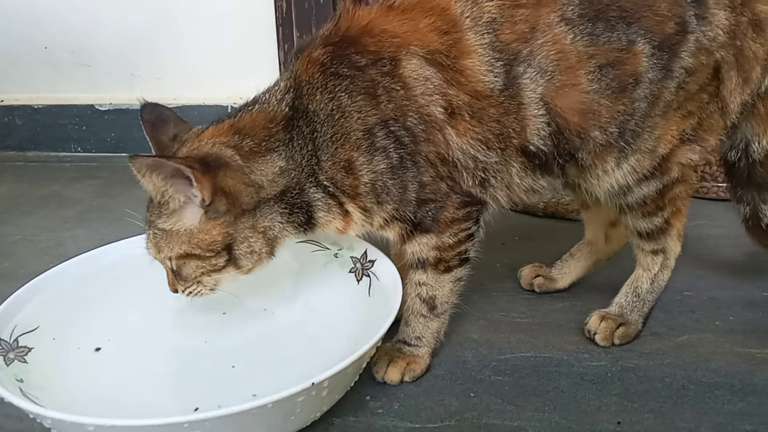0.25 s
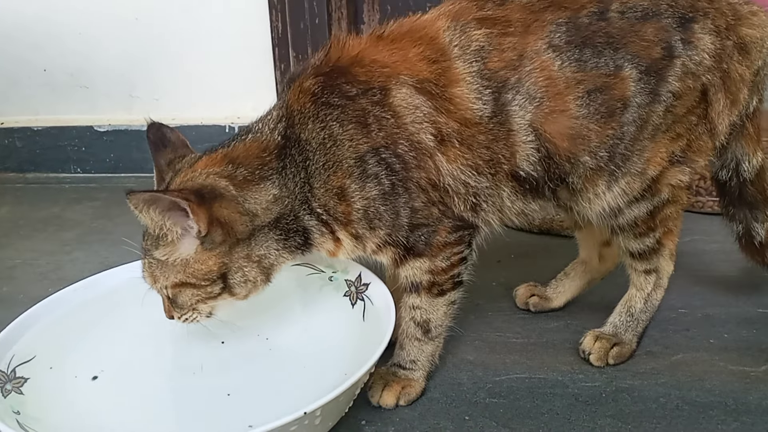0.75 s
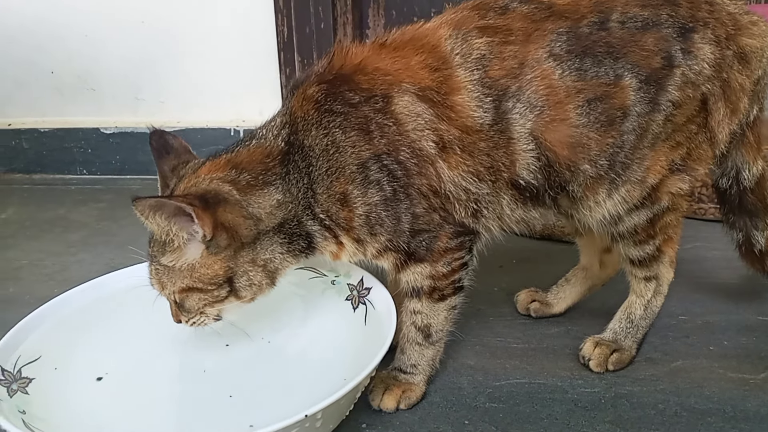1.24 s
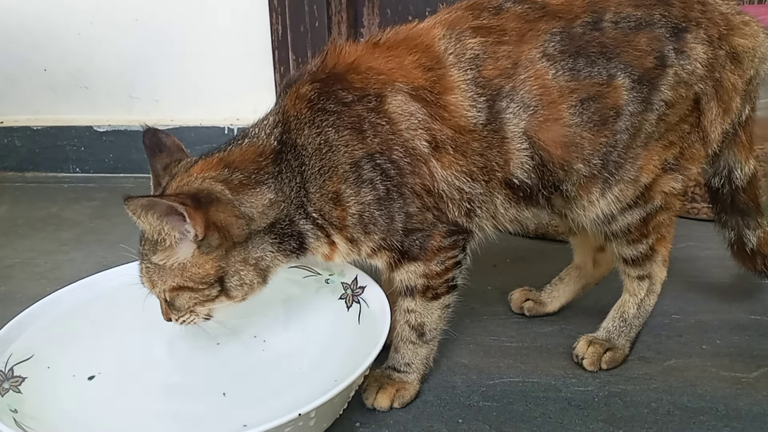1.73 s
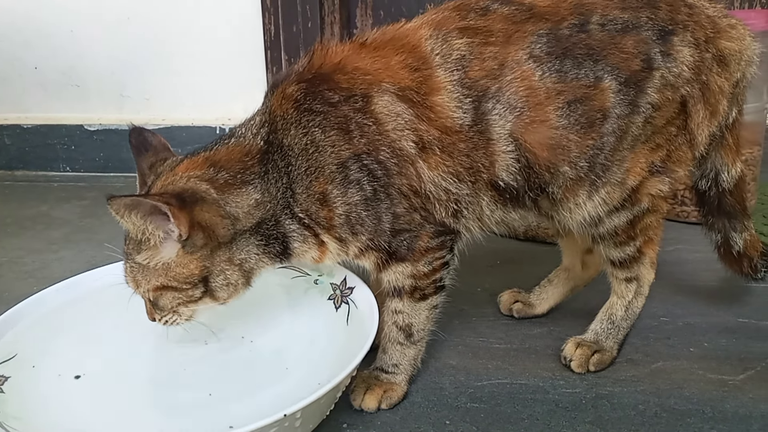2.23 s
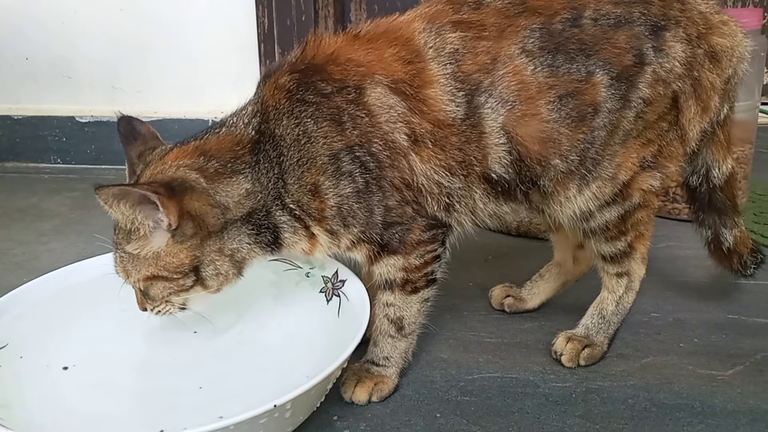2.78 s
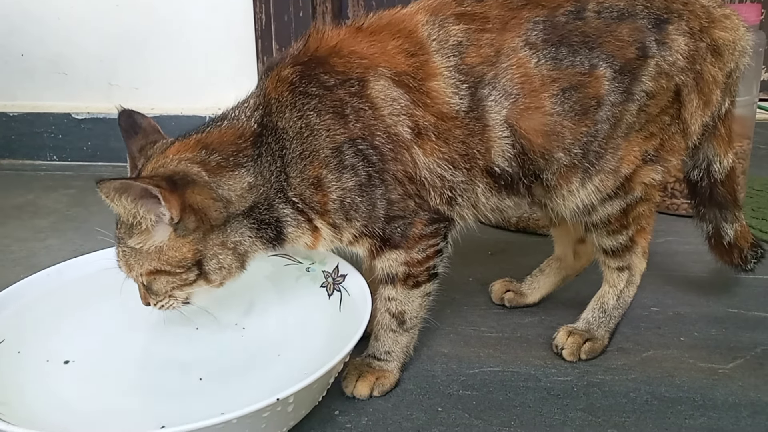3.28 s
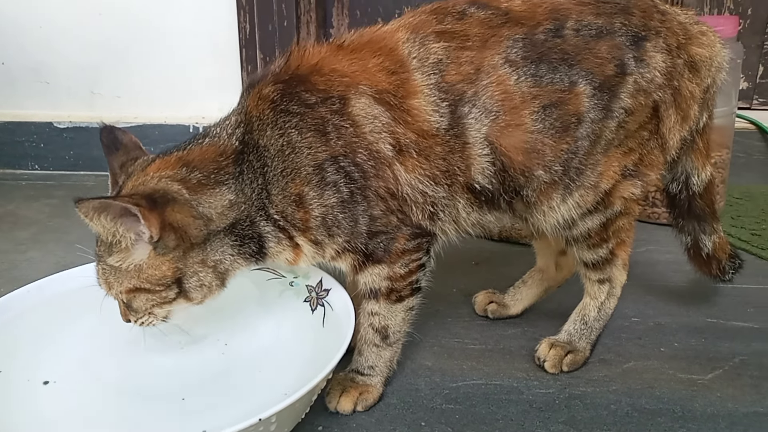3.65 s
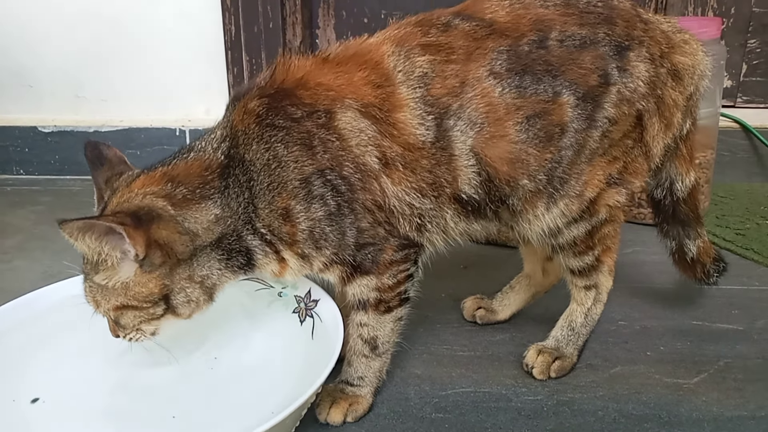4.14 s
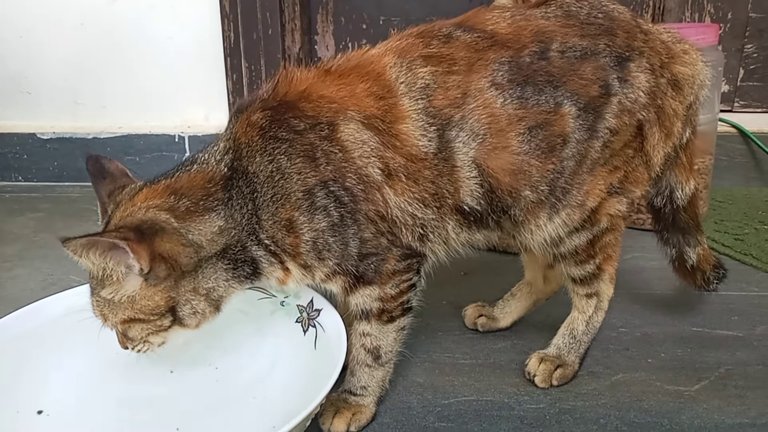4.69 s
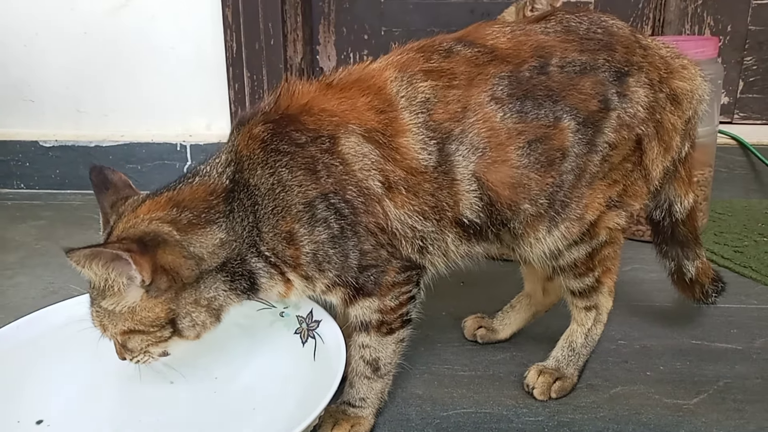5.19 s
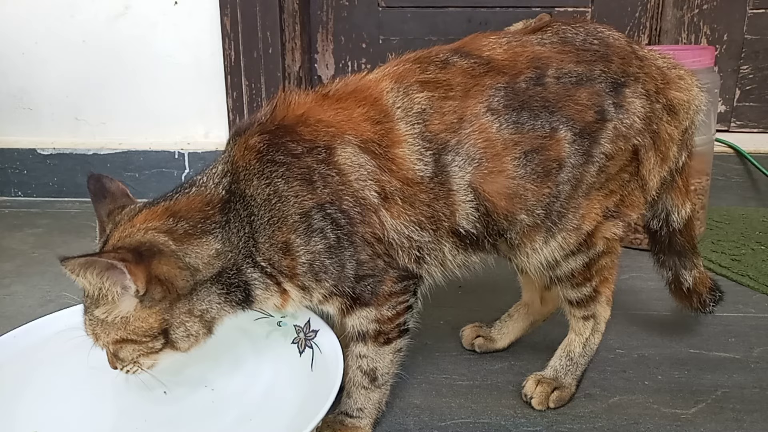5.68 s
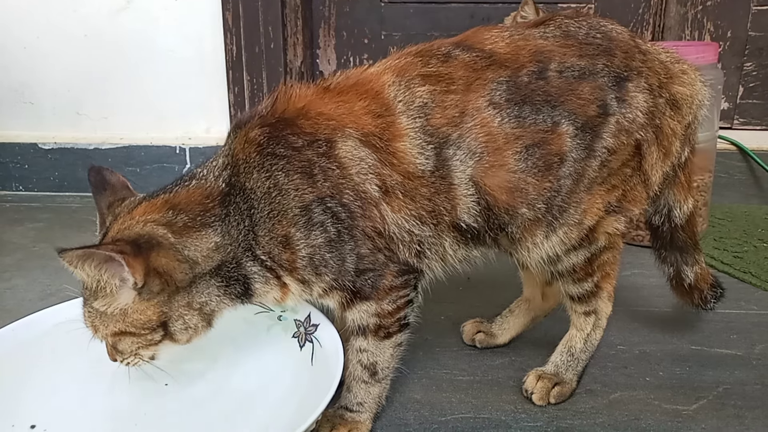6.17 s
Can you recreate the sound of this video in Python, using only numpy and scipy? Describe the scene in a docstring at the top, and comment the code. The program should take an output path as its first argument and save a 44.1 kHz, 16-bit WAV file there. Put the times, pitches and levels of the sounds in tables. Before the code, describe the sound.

A shrill, very high chorus of insects trills throughout on an outdoor porch, mostly to the left, easing slightly after 3.5 seconds. A fainter insect chirps about five times a second beneath it. A cat meows right at the start for half a second, rising a little in pitch, and again, slightly hoarse, from 2.7 to 3.3 seconds. Close by, another cat laps from a basin with small, irregular wet clicks and tiny droplet ticks, clearest between 1 and 2.2 seconds, then quieter, with one clearer smack near 5 seconds. A few soft knocks come from the basin. Far away, faint barks sound between 0.5 and 2 seconds and near 3.3. A distant insect rasps briefly around 2.2 and 5.6 seconds, and a bird gives faint, thin whistles near 3.8, 4.8 and 6 seconds. A faint low motor hum and rumble lie underneath.

```python
"""Porch, insects and two cats

Garden insects, mostly left: a shrill chorus of clicking drums, a very high wing buzz, a steady chirper.
An unseen cat meows twice (vocal-fold harmonics through moving formants); a near cat laps from a basin
(tongue clicks, droplets, soft knocks). Far off: rasps, a thin whistle, a drone of frogs and insects,
soft barks, a thin bird, and a motor hum in low rumble and hiss."""
import sys
import numpy as np
from scipy import signal
from scipy.fft import rfft, irfft
from scipy.io import wavfile

SR = 44100
rng = np.random.default_rng(int(sys.argv[2]) if len(sys.argv) > 2 else 0)


def store_wav(level_fs):
    """Save 16-bit WAV to argv[1]."""
    pcm = np.round(np.clip(np.atleast_2d(level_fs), -1, 1) * 32767)
    wavfile.write(sys.argv[1], SR, pcm.T.astype(np.int16))


N = 283122
T = np.arange(N) / SR
FREQS = np.maximum(np.arange(N // 2 + 1) * SR / N, 1)


def undb(db):
    """Decibels to gain."""
    return 10 ** (np.asarray(db) / 20)


def unit(x):
    """Scale to rms 1."""
    return x / np.sqrt(np.mean(x ** 2) + 1e-18)


def noise():
    """Full-length white noise."""
    return rng.standard_normal(N)


def curves(table):
    """Columns interpolated linearly over the first, t/s."""
    s, *columns = np.transpose(table)
    return [np.interp(T, s, c) for c in columns]


def phase_rad(hz):
    """Running phase of a varying frequency."""
    return 2 * np.pi * np.cumsum(hz) / SR


def colour(x, spectrum):
    """Filter by (f/Hz, level/dB) points; -60 dB/octave beyond the ends."""
    hz, db = np.transpose(spectrum)
    beyond_oct = np.abs(np.log2(FREQS / np.clip(FREQS, hz[0], hz[-1])))
    return irfft(rfft(x) * undb(np.interp(np.log(FREQS), np.log(hz), db) - 60 * beyond_oct), N)


def resonance(hz, centre_hz, width_hz):
    """Steep resonance, gain 1 at centre."""
    return 1 / (1 + ((hz ** 2 - centre_hz ** 2) / (hz * width_hz)) ** 2)


def band(centre_hz, width_hz):
    """Noise in one resonance, rms 1."""
    return unit(irfft(rfft(noise()) * resonance(FREQS, centre_hz, width_hz), N))


def walk(rate_hz):
    """Smooth random drift, rms 1."""
    return unit(irfft(rfft(noise()) * np.exp(-(FREQS / rate_hz) ** 2), N))


def burst(t, rise_s, decay_s):
    """Gaussian rise to 1 at t = 0, exponential decay."""
    return np.exp(-(np.minimum(t, 0) / rise_s) ** 2 - np.maximum(t, 0) / decay_s)


def add(out, start_s, sound):
    """Mix a short sound into out."""
    i = int(start_s * SR)
    a, b = max(i, 0), min(i + len(sound), N)
    out[a:b] += sound[a - i:b - i]


def taps(table, width_ratio, rise_s, decay_s, gain_db=0):
    """Damped bursts of resonant noise; rows: t/s, level/dB, f/Hz."""
    out, t = np.zeros(N), np.arange(-SR // 20, SR // 5) / SR
    hz = np.maximum(np.arange(len(t) // 2 + 1) * SR / len(t), 1)
    for s, db, centre_hz in table:
        grit = rfft(rng.standard_normal(len(t)))
        ring = unit(irfft(grit * resonance(hz, centre_hz, width_ratio * centre_hz), len(t)))
        add(out, s + t[0], undb(db + gain_db) * ring * burst(t - .001, rise_s, decay_s))
    return out


def porch(x, pan_db, wet_db, t60_s, lag_s=0.001419):
    """Direct sound, later on the left, plus scattered reflections; pan_db > 0 is left."""
    t = np.arange(SR // 2) / SR
    echo = rng.standard_normal((2, len(t))) * undb(-60 * t / t60_s) * (t > .003)
    response = echo * undb(wet_db) / np.linalg.norm(echo, axis=1, keepdims=True)
    response[0, int(lag_s * SR)] += 1
    response[1, 0] += 1
    response *= undb([[pan_db / 2], [-pan_db / 2]])
    return signal.fftconvolve(x[None], response / np.linalg.norm(response.mean(0)))[:, :N]


def diffuse(spectrum, envelope, pan_db, shared=0.18, lag_s=.0014):
    """Wide stereo noise, mid rms 1; its shared part reaches the left later."""
    common = shared * noise()
    sides = np.array([noise() + np.roll(common, int(lag_s * SR)), noise() + common])
    sides = colour(sides * envelope, spectrum) * undb([[pan_db / 2], [-pan_db / 2]])
    return sides / sides.mean(0).std()


def wing_strokes(stroke_hz=22.63, scrape_hz=91, depth=0.4, rest=0.3):
    """Wing-stroke envelope: four short scrapes, then a rest."""
    age_s = (np.cumsum(stroke_hz * (1 + 0.0053 * walk(1.9))) / SR % 1) / stroke_hz
    mid_stroke = np.sin(np.pi * stroke_hz * age_s) ** 2
    scrapes = 1 + depth * np.cos(2 * np.pi * scrape_hz * age_s) * mid_stroke
    return scrapes * (1 - rest * (1 - mid_stroke))


def chorus(db, strokes, click_hz=103, decay_s=0.0018, crowd=0.97):
    """Two insects click resonant drums at unequal rates over a crowd's hiss; wing strokes add throb."""
    # drum resonances: f/Hz, level/dB
    spectrum = [(5500, -59), (6100, -28), (6550, -15), (6740, -19), (7080, -5.5), (7260, -2), (7400, 2),
                (7540, -1.5), (7700, -3.5), (8000, -20), (8500, -32), (8900, -52), (9300, -86)]
    power = crowd ** 2
    for k in range(2):
        cycles = np.cumsum(click_hz * (1 - 0.082 * k) * (1 + .035 * walk(3.6))) / SR
        age_s = (cycles % 1) / click_hz
        power = power + undb(-5 * k) * np.exp(-2 * age_s / decay_s)
    envelope = np.sqrt(power) * undb(0.71 * walk(47))
    throb = 1 + 0.52 * (strokes - strokes.mean())
    return diffuse(spectrum, envelope, pan_db=19.5, shared=0.83) * undb(db) * throb


def high_buzz(db, strokes):
    """Scraping wings ring near 15 kHz."""
    # wing resonances: f/Hz, level/dB
    spectrum = [(12500, -63), (13500, -37), (13950, -29), (14300, -5.5), (14650, 4), (15150, 4), (15650, 0),
                (16000, -12)]
    return diffuse(spectrum, strokes, pan_db=10.5, shared=0.6) * undb(db)


def near_insect(hz, db, pulse_hz, depth, pan_db, waver_hz=14):
    """One insect stands out as a wavering, pulsing tone."""
    carrier = np.sin(phase_rad(hz + waver_hz * walk(10.02)))
    pulses = 1 + depth * np.cos(phase_rad(pulse_hz * (1 + 0.01116 * walk(3.3))))
    return porch(unit(carrier * pulses) * undb(db), pan_db, wet_db=-16, t60_s=0.13)


def chirper(first_s=-0.017, peak_db=-51.5, tooth_hz=190, trill_db=-68):
    """About five scrapes a second, each brightening late, over a faint steady trill."""
    # wing resonance: f/Hz, level/dB
    spectrum = [(4200, -54), (4480, 6), (4700, 14.5), (5000, 4.5), (5600, -5.5), (6100, -28)]
    # chirp tempo: t/s, rate/Hz
    tempo = [(0, 4.855), (2.4, 4.727), (3.0, 5.043), (5.0, 4.722), (5.7, 5.094), (6.4, 4.888)]
    rate_hz, = curves(tempo)
    cycles = np.cumsum(rate_hz) / SR - first_s * rate_hz[0]
    nearest = np.round(cycles).astype(int)
    age_s = (cycles - nearest) / rate_hz
    peak = undb(peak_db + rng.standard_normal(nearest[-1] + 1))[nearest]
    teeth = 1 + .5 * np.sin(phase_rad(tooth_hz * (1 + 0.047 * walk(16.74))))
    envelope = peak * burst(age_s, 0.018, 0.028) + undb(trill_db)
    body = diffuse(spectrum, teeth, pan_db=12.5, shared=0.98) * envelope
    upper = band(5300, 600) * teeth * peak * undb(-5) * burst(age_s - 0.0084, 0.016, 0.019)
    return body + porch(upper, pan_db=6, wet_db=1, t60_s=0.18)


def thin_insect(db=-72, first_dip_s=0.19, period_s=0.675, dip_s=0.095, depth=0.78):
    """Thin whistle on the right with short, even dips."""
    # whistle band: f/Hz, level/dB
    spectrum = [(9300, -31), (10300, -8.5), (10850, 12), (11200, -6.5), (12500, -45)]
    from_dip_s = (((T - first_dip_s) / period_s + .5) % 1 - .5) * period_s
    phrases = 1 - depth * np.exp(-(from_dip_s / dip_s) ** 2)
    return diffuse(spectrum, phrases, pan_db=-41) * undb(db)


def far_drone(waver_db=3.96):
    """Distant frogs and insects blur into wavering bands."""
    # call bands: f/Hz, width/Hz, level/dB
    bands = [(1543, 85, -67), (1894.5, 101, -64), (2231, 40, -71.5)]
    drone = sum(band(hz, width_hz) * undb(db + waver_db * walk(9)) for hz, width_hz, db in bands)
    return porch(drone, pan_db=36.5, wet_db=-1, t60_s=0.076)


def rumble(base_db=-56.5, wander_db=4):
    """Low rumble that wanders in level and briefly swells."""
    # rumble spectrum: f/Hz, level/dB
    spectrum = [(22, -26), (42, -16.5), (65, 0), (85, -5.5), (110, 0), (135, -6.5), (170, -2), (230, -13),
                (290, -18.5), (400, -21)]
    # swell crests: t/s, level/dB
    crests = [(0.12, -48), (1.96, -46.5), (2.24, -49), (2.54, -49), (3.15, -44.5), (4.72, -45.5),
              (4.91, -47.5), (5.5, -50.5)]
    swells = sum(undb(db) * burst(T - s, 0.028, 0.018) for s, db in crests)
    envelope = np.hypot(undb(base_db + wander_db * walk(7.5)), swells)
    return diffuse(spectrum, 1, pan_db=4, shared=7.4, lag_s=0.0011) * envelope


def motor_hum(gain_db=-2, waver_db=5.1, waver_hz=2.46):
    """Far motor: four low partials, each wavering in level and pitch."""
    # motor partials: f/Hz, relative level/dB
    partials = [(64.6, -76), (107.7, -67), (188.4, -65.5), (231.5, -67)]
    hum = np.zeros(N)
    for hz, db in partials:
        amplitude = np.sqrt(2) * undb(db + gain_db + waver_db * walk(21))
        hum += amplitude * np.sin(phase_rad(hz + waver_hz * walk(6.13)))
    return porch(hum, pan_db=7, wet_db=-25, t60_s=0.093)


def air(db=-61.5):
    """Faint, wide outdoor hiss."""
    # hiss spectrum: f/Hz, level/dB
    spectrum = [(280, 0.5), (450, -2.5), (900, 1), (1300, 0.5), (1700, 4), (2400, -0.5), (3200, 3.5),
                (3900, -10), (4300, -3.5), (5600, -25)]
    return diffuse(spectrum, undb(1.36 * walk(4.5)), pan_db=6.5, shared=0.31) * undb(db)


def mouth(age_s, held_s, db, open_s, close_s=0.13, linger_s=0.086, fall_db_per_s=138):
    """Hum, open, hold, close: gains of the fundamental and both formants, and closure (0-1)."""
    closing_s = np.maximum(age_s - held_s, 0)
    shut = 1 - np.exp(-closing_s / close_s)
    opening = np.exp(-(np.minimum(age_s - open_s, 0) / open_s) ** 2)
    brightening = 1 - np.exp(-(np.maximum(age_s, 0) / 0.023) ** 2)
    closed_hum = undb(-38.5) * burst(age_s + 0.021, 0.043, 0.024)
    hum = closed_hum + opening * undb(-54 - 1.5 * shut)
    first = opening * undb(db - 7 - fall_db_per_s * np.maximum(closing_s - linger_s, 0))
    second = brightening * undb(db - 21.5 * shut)
    return hum, first, second, shut


def meow(call, glide, open_s=0.0054, release_s=0.054, ring_hz=6250, rasp_db=-9):
    """Vocal-fold harmonics through two mouth formants; the folds waver and rasp when pressed."""
    opens_s, held_s, stops_s, db, first_hz, first_width_hz, second_hz, second_width_hz = call
    pitch_hz, = curves(glide)
    age_s = T - opens_s
    hum_gain, first_gain, second_gain, shut = mouth(age_s, held_s, db, open_s)
    hoarse = 0.11 + 0.472 * burst(age_s - 0.0773, 0.023, 0.057)
    voiced = np.clip((stops_s - T) / release_s + .5, 0, 1)
    on = (voiced > 0) & (age_s > -2 * open_s)
    jitter = hoarse * (0.0196 * walk(60) + 0.0503 * walk(167))
    phase = phase_rad(pitch_hz * (1 + jitter))

    harmonics = np.arange(2, 13)[:, None]
    hz = harmonics * pitch_hz[on]
    since_open_s = np.maximum(age_s[on], 0)
    tight = (pitch_hz[on] / 590) ** .5  # mouth tightens as pitch climbs
    jaw = 1 - 0.59 * np.exp(-since_open_s / 0.076)  # jaw drops, first formant climbs
    tongue = 1 + 0.57 * np.exp(-since_open_s / 0.025)  # second formant drops: "ee" into "ow"
    narrowing = np.maximum(1 - 0.94 * shut[on], .1)
    lowpass = 1 / (1 + (hz / (3600 * tight)) ** 40)
    first = resonance(hz, first_hz * jaw, first_width_hz * narrowing) * lowpass
    second = resonance(hz, second_hz * tight * tongue, second_width_hz) * lowpass
    gains = np.hypot(first_gain[on] * first / np.linalg.norm(first, axis=0),
                     second_gain[on] * second / np.linalg.norm(second, axis=0))
    gains += undb(-33) * np.sqrt(second_gain[on]) * resonance(hz, ring_hz, 1200)  # lingering ring
    gains *= undb(2.9 * np.array([walk(19)[on] for _ in harmonics]))

    voice = np.zeros(N)
    voice[on] = np.sqrt(2) * (gains * np.sin(harmonics * phase[on])).sum(0)
    rasp = unit(colour(noise(), [(1500, -33), (2100, 5), (2900, 5), (3300, 5), (3650, -18)]))
    voice += rasp * (1 + np.cos(phase)) * hoarse * second_gain * undb(rasp_db)
    hum = np.sqrt(2) * hum_gain * np.sin(phase)  # the fundamental bends round to both sides
    return (porch(voice * voiced, pan_db=11, wet_db=-2, t60_s=0.33)
            + porch(hum * voiced, pan_db=5, wet_db=-9, t60_s=0.43, lag_s=0.00098))


def unseen_cat():
    """Two meows, each with its own pitch glide."""
    # meows: open/s, hold/s, stop/s, level/dB, formant 1/Hz, width/Hz, formant 2/Hz, width/Hz
    calls = [(-0.07, 0.19, 0.486, -32.5, 1800, 1040, 2890, 790),
             (2.702, 0.27, 3.25, -34, 1750, 1300, 2700, 1240)]
    # pitch, one list per meow: t/s, f/Hz
    glides = [
        [(0.0, 551.7), (0.08, 594), (0.27, 610.2), (0.28, 625), (0.47, 664)],
        [(2.63, 611), (2.684, 521.5), (2.716, 513.7), (2.782, 535), (2.8, 519.2), (2.94, 565.5), (3.24, 598.6)],
    ]
    return sum(meow(call, glide) for call, glide in zip(calls, glides))


def lapping(start_s=3.933, period_s=0.215, return_s=0.088, db=-52.5, bright_db=-19):
    """Smack rows for four quiet laps: the tongue ticks going in and coming out."""
    times_s = (start_s + period_s * np.arange(4)[:, None] + [0, return_s]).ravel()
    return [(s, db + 2.5 * rng.standard_normal(), bright_db) for s in times_s]


def drinking_cat(mouth_hz=3300, teeth_hz=5850):
    """Laps click in two broad mouth resonances; droplets snap; mouth and paws knock softly."""
    # tongue smacks: t/s, relative level/dB, upper resonance offset/dB
    smacks = [(0.115, -47, 12), (0.4414, -38, -10), (1.0992, -36.5, -4), (1.3243, -41, -20),
              (1.491, -36.5, 0), (1.7125, -30, -1.5), (1.929, -42, -13), (2.0674, -34.5, -25),
              (3.3605, -50, 8), (4.946, -40, 3.5), (5.0684, -50, -3), (5.2926, -42, -27), (6.0534, -50, -2)]
    # droplet snaps: t/s, relative level/dB, f/Hz
    droplets = [(0.1131, -37, 9400), (0.9477, -38, 11400), (1.0999, -39, 10500), (1.1967, -32, 10500),
                (1.4905, -41, 9480), (1.7729, -45, 11200), (2.2079, -34, 11200), (3.2265, -36, 11460),
                (3.36, -38, 10100), (3.6227, -37.5, 10700), (3.677, -42, 11400)]
    # knocks at the basin: t/s, relative level/dB, f/Hz
    knocks = [(0.119, -73, 1230), (1.278, -56.5, 510), (2.266, -66, 720), (3.359, -61, 614),
              (3.448, -56, 496), (3.529, -67, 1390), (3.668, -64, 567), (3.87, -54.5, 1440)]
    ticks = smacks + lapping()
    low = [(s, db, mouth_hz) for s, db, _ in ticks]
    high = [(s, db + bright_db, teeth_hz) for s, db, bright_db in ticks]
    laps = taps(low, width_ratio=.22, rise_s=.0045, decay_s=.0038, gain_db=-2)
    laps += taps(high, width_ratio=.24, rise_s=.002, decay_s=.0025, gain_db=-4)
    spray = taps(droplets, width_ratio=.18, rise_s=.002, decay_s=.0013, gain_db=-13)
    thuds = taps(knocks, width_ratio=.66, rise_s=.002, decay_s=.0068, gain_db=8)
    tongue = colour(laps, [(2500, -10), (2900, 0), (3700, -1.5), (4200, -12.5), (5200, 4), (7500, 9)])
    return (porch(tongue, pan_db=14.5, wet_db=-6, t60_s=0.1)
            + porch(spray, pan_db=-13, wet_db=-2, t60_s=0.08)
            + porch(thuds, pan_db=14, wet_db=-5, t60_s=0.18))


def far_barks():
    """Distance leaves one soft, hollow band of each bark."""
    # barks and yelps: t/s, level/dB, f/Hz
    barks = [(.5, -55, 828), (1.0, -58, 770), (1.46, -58.5, 795), (1.86, -57.5, 770), (3.28, -54.5, 1080),
             (3.39, -54.5, 1280)]
    bursts = taps(barks, width_ratio=.46, rise_s=.031, decay_s=.024)
    return porch(bursts, pan_db=6, wet_db=4, t60_s=0.24)


def rasping_insect(swell_db_per_s=16, attack_s=0.082, fall_s=0.071):
    """A farther insect: two long rasps that swell and stop."""
    # insect resonances: f/Hz, level/dB
    spectrum = [(2700, -17.5), (3150, -3.5), (3450, -4), (3650, 1), (3950, -1), (4130, -8), (4350, -52)]
    # rasps: t/s, length/s, end level/dB
    calls = [(2.08, 0.32, -47.5), (5.467, 0.28, -50)]
    envelope = np.zeros(N)
    for s, length_s, db in calls:
        held_s = np.clip(T, s, s + length_s)
        swell = undb(db - swell_db_per_s * (s + length_s - held_s))
        envelope += swell * burst(T - held_s, attack_s, fall_s)
    return diffuse(spectrum, undb(2 * walk(100)), pan_db=13) * envelope


def far_bird():
    """Short, thin whistles sliding up or down."""
    # slurs: t/s, length/s, start f/Hz, end f/Hz, level/dB
    slurs = [(3.737, .07, 5650, 5970, -65), (3.83, 0.062, 6300, 5700, -53), (4.126, 0.094, 6000, 6100, -65),
             (4.832, .09, 5930, 6200, -57), (6.01, .09, 5800, 6300, -60)]
    out = np.zeros(N)
    for s, length_s, start_hz, end_hz, db in slurs:
        hz = np.linspace(start_hz, end_hz, int(length_s * SR))
        add(out, s, undb(db) * np.sqrt(2) * np.hanning(len(hz)) * np.sin(phase_rad(hz)))
    return porch(out, pan_db=17, wet_db=-10, t60_s=0.23)


def scene():
    """Stereo mix at the porch."""
    # insect loudness: t/s, chorus level/dB, buzz level/dB
    levels = [(0, -32, -39.8), (1.5, -31.5, -39.6), (3.0, -31.7, -39.8), (3.6, -33, -41.5),
              (4.6, -34, -43.4), (5.4, -34.3, -45), (6.4, -35.2, -45.8)]
    chorus_db, buzz_db = curves(levels)
    strokes = wing_strokes()
    insects = near_insect(7380, chorus_db - 8, pulse_hz=104.4, depth=1, pan_db=19)
    insects += near_insect(14638, buzz_db - 15, pulse_hz=90.7, depth=0.44, pan_db=12)
    insects += chorus(chorus_db - 0.3, strokes) + high_buzz(buzz_db, strokes) + chirper()
    insects += rasping_insect() + thin_insect() + far_drone()
    cats = unseen_cat() + drinking_cat()
    return insects + cats + far_bird() + far_barks() + rumble() + motor_hum() + air()


def record(dry, top_hz=15900):
    """Steep low-pass on the very top."""
    return signal.sosfilt(signal.ellip(10, .2, 80, top_hz, fs=SR, output="sos"), dry)


dry = scene()
out = record(dry)
store_wav(out)
```